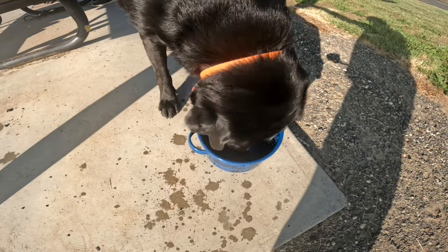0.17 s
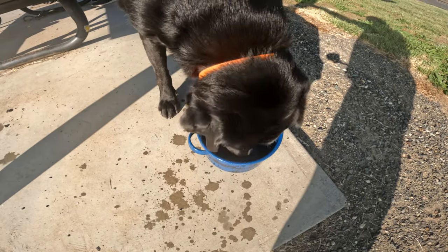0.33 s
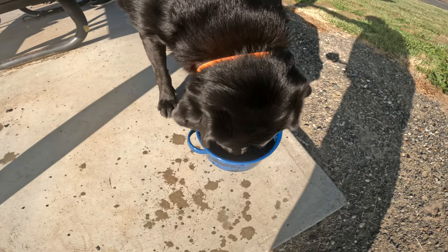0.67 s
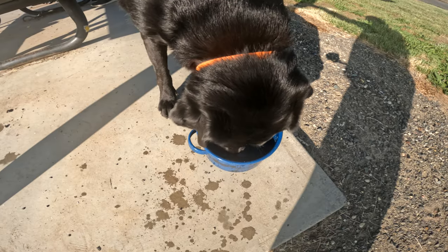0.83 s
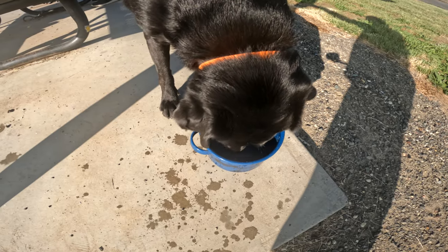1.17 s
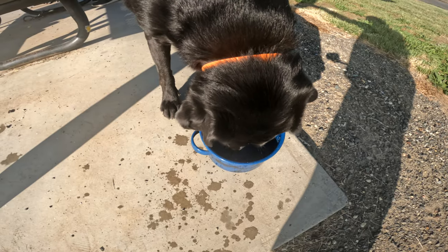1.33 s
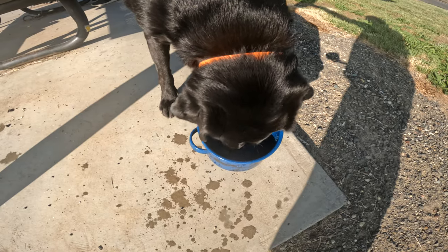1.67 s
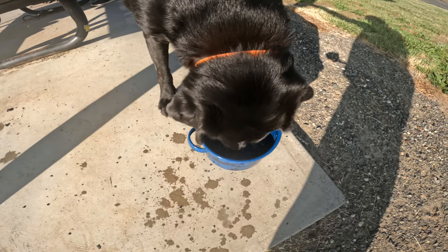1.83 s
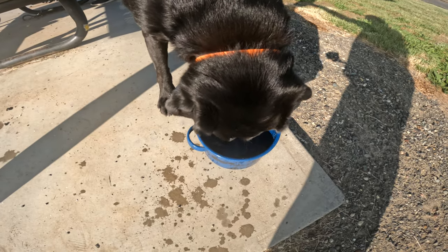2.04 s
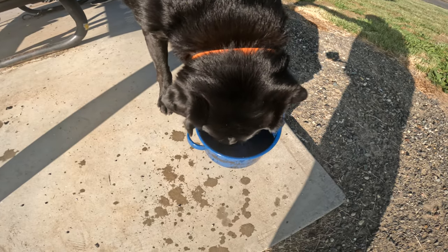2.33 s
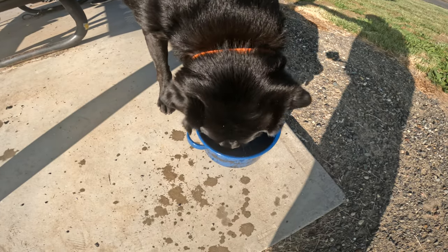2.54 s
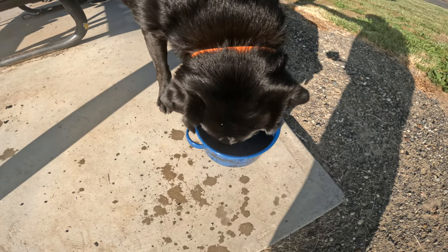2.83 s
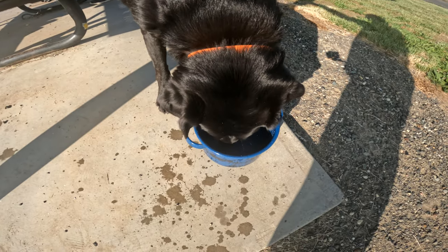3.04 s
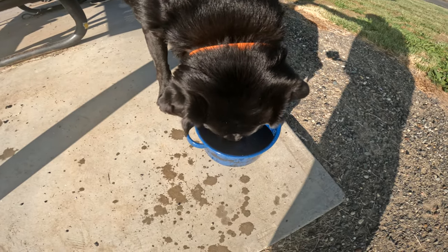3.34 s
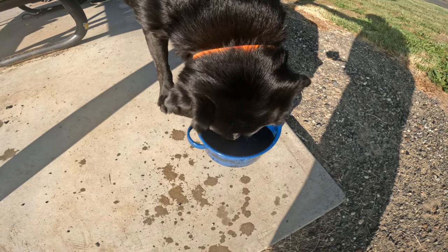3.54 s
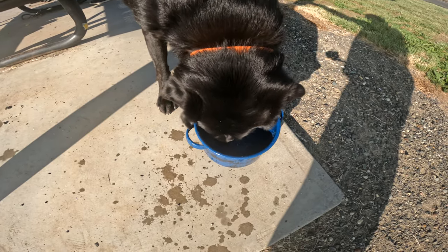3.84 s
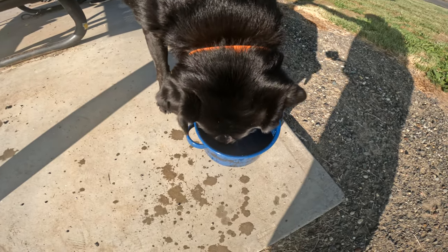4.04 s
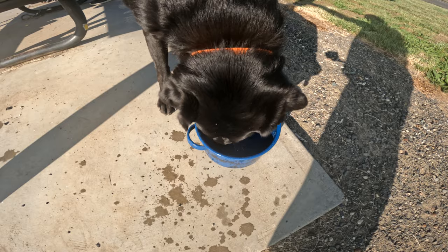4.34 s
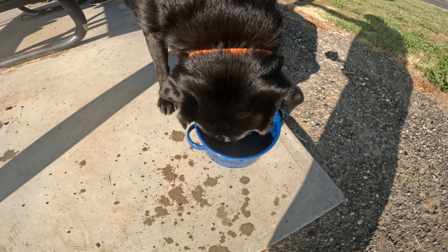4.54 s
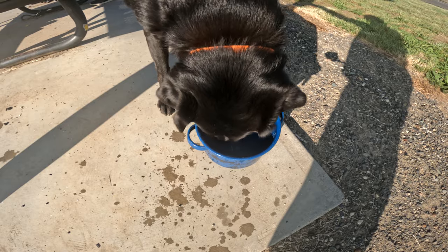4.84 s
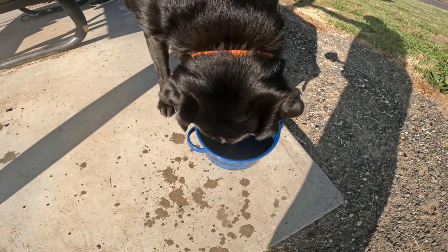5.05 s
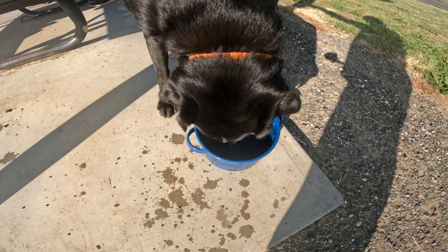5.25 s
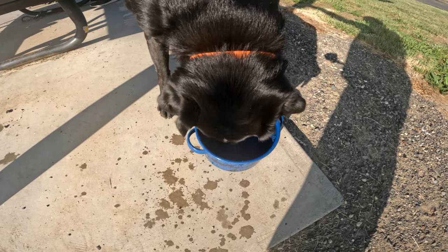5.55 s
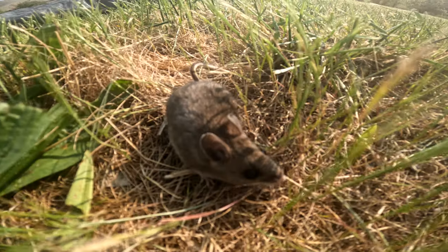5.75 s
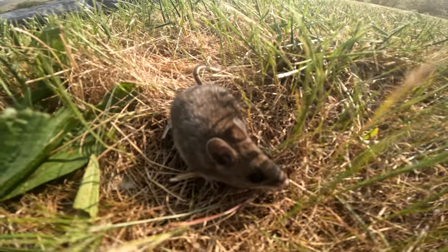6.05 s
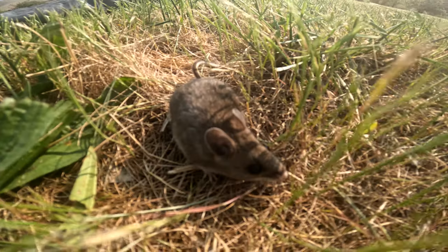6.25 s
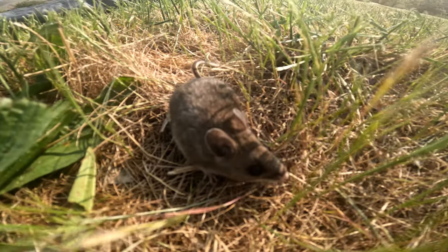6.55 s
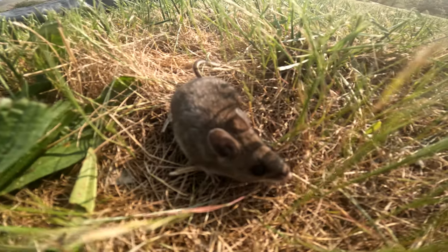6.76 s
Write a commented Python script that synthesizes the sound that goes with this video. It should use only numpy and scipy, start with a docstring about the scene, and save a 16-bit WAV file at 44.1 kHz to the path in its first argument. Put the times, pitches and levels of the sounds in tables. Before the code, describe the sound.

In quiet open air, dull low wind thuds bump the microphone in the first 0.2 seconds, with a faint buzzy bird call. From about 0.2 s a big dog laps water close by, nearly three times a second, from a plastic bowl on concrete. Each lap is a small splash, a hollow gulp and a crisp wet snap of the jaws, with bubbles, drips and bright ticks between and slight bowl resonance. A cricket chirps high and softly behind; a bird trills at 0.6-0.9 s and others whistle occasionally. Wind returns lightly near 3.6 s, thuds most strongly around 4.1-4.6 s and bumps again at 5.7 s. Snaps grow sharper towards the end. At 5.8 s lapping and cricket stop abruptly with a dry click. Much quieter sound follows: short sliding bird chirps over a distant, fading low rumble, with a faint grass rustle near 6.4 s.

```python
"""Dog drinking outdoors

A big dog laps water from a plastic bowl on a concrete pad, nearly three laps a second. In each lap the tongue
strikes the water and lifts a splashing column whose hollow closes with a gulp; the jaws snap. These are ringing
air pockets over bubbles and filtered noise, coloured by bowl resonances and weak reflections. Wind is low noise
with thuds; birds and a cricket are gliding tones. Then the scene changes with a dry click: lapping and cricket
stop, and a distant rumble comes in under the birdsong."""
import sys
import numpy as np
from scipy import signal
from scipy.fft import rfft, irfft, next_fast_len
from scipy.io import wavfile
from scipy.ndimage import uniform_filter1d

SR = 44100
rng = np.random.default_rng(int(sys.argv[2]) if len(sys.argv) > 2 else 0)


def store_wav(level_fs):
    """Save 16-bit WAV to argv[1]."""
    pcm = np.round(np.clip(np.atleast_2d(level_fs), -1, 1) * 32767)
    wavfile.write(sys.argv[1], SR, pcm.T.astype(np.int16))


N = 304255
TIME = np.arange(N) / SR
LAPPING_END_S = 5.81

# The laps, one row each; every delay counts from the strike.
# Each row: strike in seconds, strike level in dB, lift delay in seconds, spatter level in dB, spray level in dB,
# gulp delay in seconds, gulp pitch in Hz, gulp level in dB, snap delay in seconds, snap pitch in Hz, snap level in dB.
LAPS = [(0.233, -52, 0.013, -40.5, -45, 0.034, 439.5, -30, 0.078, 3490, -29),
        (.508, -36, 0.041, -37, -43, 0.076, 650, -32, .12, 3400, -25),
        (0.854, -50, 0.034, -41.5, -52, 0.12, 220.5, -26, 0.16, 1100, -38.5),
        (1.206, -45.5, 0.028, -43, -42, 0.067, 520, -33, 0.12, 1100, -37.5),
        (1.598, -42.5, 0.06, -42, -47, 0.1, 389, -24, 0.15, 2630, -32),
        (1.946, -45.5, 0.056, -44.5, -44.5, 0.088, 395.6, -27, 0.14, 3260, -35.5),
        (2.358, -51.5, 0.07, -35.5, -40, 0.089, 565, -30.5, 0.14, 3100, -20),
        (2.691, -42, 0.044, -43.5, -43, 0.086, 414, -21.5, 0.13, 3780, -32.5),
        (3.069, -38.5, 0.046, -41, -46, 0.1, 429.5, -25, 0.13, 1640, -26),
        (3.403, -46.5, 0.054, -42, -42.5, 0.089, 442.4, -27.5, 0.18, 2344, -48.5),
        (3.82, -43.5, 0.071, -38, -49, .099, 498, -29.5, .127, 2960, -26),
        (4.145, -39, 0.054, -35.5, -42.5, 0.094, 357, -27.5, 0.13, 3390, -30),
        (4.527, -40, 0.048, -39, -44, 0.097, 435.4, -26, 0.14, 3860, -28.5),
        (4.855, -36, 0.035, -39, -39, 0.09, 480, -27.5, 0.12, 945, -27.5),
        (5.246, -44.5, 0.053, -36, -44.5, 0.095, 412.3, -27.5, 0.1345, 2480, -20),
        (5.591, -40, 0.044, -41, -46, 0.095, 500, -28.5, .1135, 2730, -17.5)]
# Colour of the spatter. Each row: frequency in Hz, relative level in dB.
SPATTER_COLOUR = [(150, 16), (300, -6), (560, 0), (780, -19.5), (1100, 6.5), (1400, -7), (2300, -1.5),
                  (3500, -3), (5000, -2.5), (7000, -8), (10000, -28.5)]
# Water pockets swell over a few cycles; those above the reference pitch ring shorter.
POP_RISE_CYCLES, POP_REFERENCE_HZ = 1.01, 2000


def undb(db):
    """Decibels to gain."""
    return 10 ** (np.asarray(db) / 20)


def unit(x):
    """Scale to rms 1."""
    return x / np.sqrt(np.mean(x ** 2))


def even(x, seconds):
    """Hold the short-term rms close to 1."""
    k = int(seconds * SR) + 1
    power = uniform_filter1d(uniform_filter1d(x ** 2, k), k)
    return x / np.sqrt(power + 1e-12)


def span(seconds):
    """Time axis of a short sound."""
    return np.arange(int(seconds * SR) + 2) / SR


def fade(t, t60):
    """Exponential decay by 60 dB in t60 seconds."""
    return np.exp(-np.log(1000) * t / t60)


def swell(s, width_s, db):
    """A bell-shaped rise and fall in level around time s."""
    return undb(db) * np.exp(-((TIME - s) / width_s) ** 2)


def walk(rate):
    """Random drift of rms 1, with about `rate` new values a second."""
    k = int(SR / rate)
    steps = np.repeat(rng.standard_normal(N // k + 1), k)
    return unit(uniform_filter1d(steps, k)[:N])


def add(out, s, x):
    """Mix x into out at time s."""
    i = min(max(int(s * SR), 0), N)
    out[i:i + len(x)] += x[:N - i]


def place(x, pan_db):
    """Put a sound between left and right; negative leans right."""
    return x * undb(np.array([[pan_db], [-pan_db]]) / 2)


def colour(x, points):
    """Causal minimum-phase filter through the given (Hz, dB) points."""
    hz, db = np.transpose(points)
    size = 8192
    grid_hz = np.fft.rfftfreq(size, 1 / SR) + 1
    response_db = np.interp(np.log(grid_hz), np.log(hz), db)
    cepstrum = irfft(np.log(undb(response_db)))
    # folding the cepstrum forwards makes the response causal
    cepstrum[1:size // 2] *= 2
    cepstrum[size // 2 + 1:] = 0
    impulse = irfft(np.exp(rfft(cepstrum)))
    return signal.oaconvolve(x, impulse)[:len(x)]


def band(x, low_hz, high_hz, order=2):
    """Butterworth band-pass."""
    edges = [low_hz, min(high_hz, SR / 2 - 1000)]
    return signal.lfilter(*signal.butter(order, edges, "band", fs=SR), x)


def noise(points):
    """Coloured noise of rms 1."""
    return unit(colour(rng.standard_normal(N), points))


def pocket(hz, t60, glide, rise_cycles=0.071):
    """An air pocket swells, rings and rises in pitch as it nears the surface; returns tone and envelope."""
    t = span(t60)
    envelope = (1 - np.exp(-t * hz / rise_cycles)) ** 2 * fade(t, t60)
    envelope /= envelope.max()
    bend = 1 + glide * (t / t60 - 1 / 3)
    return envelope * np.sin(2 * np.pi * hz * t * bend), envelope


def bubbles(rate, low_hz, high_hz, cycles, scatter_db, glide):
    """A dense stream of tiny bubbles of uneven size, each swelling softly and gliding upwards."""
    out = np.zeros(N)
    for when, pitch, size, life in rng.random((int(rate * N / SR), 4)):
        hz = low_hz * (high_hz / low_hz) ** pitch
        tone, _ = pocket(hz, cycles * (.5 + life) / hz, glide, POP_RISE_CYCLES)
        level = hz / high_hz * undb(-scatter_db * np.log(1 - size))
        add(out, when * N / SR, tone * level)
    return out


def froth(low_hz, high_hz, patchy_db, rate, count):
    """Countless bursting films, heard as noise whose bands flare up independently."""
    edges = np.geomspace(low_hz, high_hz, count + 1)
    total = np.zeros(N)
    for lo, hi in zip(edges, edges[1:]):
        total += band(rng.standard_normal(N), lo, hi) * undb(patchy_db * walk(rate))
    return unit(total)


def outdoors(air_db=-58, rumble_db=-53.5):
    """Quiet air, a far bird's buzz at first, then, after the lapping, a distant rumble and two bursts of noise."""
    # Colour of the open air. Each row: frequency in Hz, relative level in dB.
    air_colour = [(30, 2.5), (100, -21.5), (180, -3.5), (300, -17), (600, -26.5), (2500, -36),
                  (4000, -36.5), (5200, -25), (6500, -36.5), (12500, -43), (14000, -56.5)]
    # Colour of the rumble. Each row: frequency in Hz, relative level in dB.
    rumble_colour = [(30, -19.5), (80, 2), (150, 4.5), (220, -4), (330, -13.5), (520, -45.5)]
    # Bursts of noise: the breath in a rough bird chirp, then a rustle of grass.
    # Each row: middle in seconds, half-width in seconds, level in dB.
    noise_bursts = [(5.915, 0.027, -66.5), (6.401, 0.053, -61.5)]
    wide = undb(-5.0) * noise(air_colour) * np.array([[1], [-1]])  # opposite in left and right
    air = (noise(air_colour) + wide) * undb(air_db + 0.54 * walk(0.68))
    sinking_db = np.interp(TIME, [6.0, 6.8], [2, -8])
    rumble = noise(rumble_colour) * undb(rumble_db + sinking_db) * (TIME > LAPPING_END_S)
    buzz = noise([(3500, -45.5), (4700, 1.0), (5500, 7), (6800, -6), (9000, -28)])
    buzz = buzz * swell(0.09, 0.094, db=-57) * undb(2.0 * walk(115))
    hiss = noise([(300, -11), (1400, 2.5), (3000, -2), (7000, 5.5), (13000, -13)]) * undb(3.4 * walk(180))
    breath_and_grass = hiss * sum(swell(*burst) for burst in noise_bursts)
    return air + place(rumble, pan_db=-4.0) + buzz + breath_and_grass


def wind(breeze_db=-62.5, flutter_db=4):
    """Gusts over a light breeze rumble on the microphone as low noise; the hardest buffets land as thuds."""
    # Gusts. Each row: middle in seconds, half-width in seconds, level in dB before the flutter.
    gusts = [(.5, 0.31, -46.5), (3.45, 0.24, -51), (4.15, 0.11, -28), (4.47, 0.1, -33), (5.2, 0.19, -46.5),
             (5.67, 0.082, -34.5)]
    # Dull thuds. Each row: start in seconds, pitch in Hz, peak level in dB before panning.
    thuds = [(0.049, 28, -24), (0.102, 36.8, -19.5), (0.138, 99, -30), (.408, 27.5, -29.5),
             (.543, 35, -26.5), (0.766, 49, -32), (3.583, 50, -28), (3.693, 25.7, -33.5),
             (4.119, 61, -21.5), (4.184, 104, -16.5), (4.283, 37.4, -23.5), (4.527, 57.5, -20),
             (5.68, 71, -26.5)]
    strength = undb(breeze_db) + sum(swell(s, width_s, db) for s, width_s, db in gusts)
    strength = strength * undb(flutter_db * walk(25))
    roar = noise([(10, -8.5), (22, 2.5), (45, 3), (130, -15.5), (220, -27.5), (500, -74.0), (2000, -87)])
    out = strength * even(roar, 0.11)
    for s, hz, db in thuds:
        tone, _ = pocket(hz, 3.87 / hz, glide=0)
        add(out, s, undb(db) * tone)
    return out


def cricket(chirp_hz=5290, overtone_db=-35, rasp=0.036):
    """Three wing strokes a chirp, each rasping a little and arching in pitch as the wing speeds up and slows."""
    # Chirps. Each row: start in seconds, typical stroke level in dB.
    chirps = [(.223, -43), (.555, -46), (0.945, -46.5), (1.137, -45), (1.421, -44), (1.852, -45.5),
              (2.119, -45), (2.641, -43), (2.914, -41), (3.577, -44), (4.3, -46.5), (4.992, -43.5),
              (5.218, -46.5), (5.484, -44.5), (5.741, -47)]
    out, stroke_s, sag = np.zeros(N), .032, .14
    u = span(stroke_s) / stroke_s
    arch = sag * (u.var() - (u - .4) ** 2)
    for s, db in chirps:
        for k, (pitch, force) in enumerate(rng.standard_normal((3, 2))):
            roughness = rasp * rng.standard_normal(len(u))
            hz = chirp_hz * (1 + .008 * pitch + roughness + arch)
            phase = 2 * np.pi * np.cumsum(hz) / SR
            stroke = np.sin(np.pi * u) ** 2 * (np.sin(phase) + undb(overtone_db) * np.sin(2 * phase))
            add(out, s + k * stroke_s, undb(db + 2.6 * force) * stroke)
    return out


def birds(waver_db=2.5, waver=.006, trill_s=0.59, note_s=0.03, count=9):
    """Songbirds slur arched whistles that waver a little in strength and pitch; one trills rising notes."""
    # Whistles. Each row: start in seconds, length in seconds, start, middle and end pitch in Hz before the waver,
    # level in dB before the waver.
    whistles = [(0.472, 0.044, 6140, 6730, 7200, -51), (1.083, 0.1, 2620, 3280, 3330, -61),
                (1.412, 0.075, 4650, 3700, 3300, -76), (2.617, 0.057, 2700, 3250, 3420, -60),
                (4.402, 0.087, 7100, 7000, 7730, -57), (4.681, 0.078, 7800, 6100, 6000, -49),
                (4.8, 0.073, 8140, 6500, 5800, -50.5), (5.902, 0.018, 4450, 4370, 3500, -52),
                (5.903, 0.022, 5700, 5560, 4970, -53), (6.011, 0.042, 5000, 5380, 5460, -54.5),
                (6.034, 0.069, 5000, 3510, 2930, -61.5), (6.125, 0.028, 4260, 4200, 3530, -66),
                (6.157, 0.039, 4680, 4990, 5050, -57), (6.167, 0.065, 4800, 3400, 2900, -63),
                (6.248, 0.062, 4400, 3650, 2650, -58.5), (6.394, 0.066, 4400, 3630, 2700, -54.5),
                (6.401, 0.035, 4770, 5150, 5160, -55.5), (6.783, 0.037, 3530, 3960, 3990, -65.5)]
    out, strength, detune = np.zeros(N), undb(waver_db * walk(110)), 1 + waver * walk(280)
    trill = [(trill_s + k * note_s, note_s, 4000, 4530, 4850, -59) for k in range(count)]
    for s, length, start_hz, middle_hz, end_hz, db in whistles + trill:
        u = np.linspace(0, 1, int(length * SR))
        slur = np.polyfit([0, .5, 1], [start_hz, middle_hz, end_hz], 2)
        hz = np.polyval(slur, u) * np.interp(s + u * length, TIME, detune)
        add(out, s, undb(db) * np.sin(np.pi * u) * np.sin(2 * np.pi * np.cumsum(hz) / SR))
    return out * strength


def distant(x, trees_db=-11, t60=.2):
    """Trees scatter a faint tail of decaying noise behind far calls."""
    t = span(t60)
    trees = rng.standard_normal(len(t)) * fade(t, t60)
    return x + undb(trees_db) * signal.fftconvolve(x, trees / np.linalg.norm(trees))[:N]


def drips(drip_db=-64, ripple_db=-66, fizz_db=-69, start_s=0.216):
    """Under the laps, drops trickle from the jowls into rippling water and tiny bubbles burst on it."""
    drops = bubbles(rate=170, low_hz=630.0, high_hz=3070, cycles=41, scatter_db=3.5, glide=0.2)
    drops = unit(colour(drops, SPATTER_COLOUR))
    fizz = unit(bubbles(rate=110, low_hz=1482, high_hz=6340, cycles=40, scatter_db=1.5, glide=0.092))
    ripple = unit(colour(froth(620, 5220, patchy_db=11.0, rate=70, count=4), SPATTER_COLOUR))
    return (undb(drip_db) * drops + undb(fizz_db) * fizz + undb(ripple_db) * ripple) * (TIME > start_s)


def ticks(t60=0.014, low_hz=2200, high_hz=10500, tick_db=-1):
    """Drops and wet lips snap with a very short, bright crack of noise."""
    # Sharp ticks of lips and flung drops. Each row: start in seconds, level in dB before the common trim.
    tick_times = [(0.897, -19.5), (1.236, -34), (1.459, -33.5), (1.597, -42), (2.354, -30), (2.773, -23),
                  (3.062, -32.5), (3.143, -22), (3.162, -24), (3.703, -33.5), (3.8167, -24.5), (3.871, -26),
                  (3.909, -18.5), (4.07, -33), (4.143, -47), (4.264, -24.5), (4.435, -36), (4.509, -38),
                  (4.7869, -28.5), (5.2372, -33.5), (5.3394, -20.5), (5.5143, -19.5)]
    out, t = np.zeros(N), span(t60)
    for s, db in tick_times:
        crack = band(rng.standard_normal(len(t)) * fade(t, t60), low_hz, high_hz)
        add(out, s, undb(db + tick_db) * crack / np.abs(crack).max())
    return out


def flare(db, t60, attack_s, hold_s=0):
    """Power of one splash over time: attack, hold, release."""
    t = span(hold_s + t60)
    envelope = (1 - np.exp(-t / attack_s)) * fade(np.maximum(t - hold_s, 0), t60)
    return (undb(db) * envelope / envelope.max()) ** 2


def splashing(attack_s=0.0015):
    """Levels of spatter, spray and squelch as every lap touches the water, strikes it, lifts it and squeezes it."""
    touch_lead_s, trail_db, trail_t60 = 0.0087, -51, 0.48  # a wet trail begins just before the strike
    touch_spray_db = -49.5
    strike_t60, strike_spray_db = 0.093, -9  # spray in dB over the strike
    # the lifted column builds up, holds until just after the gulp and dies away
    spatter_attack_s, spatter_hold_s, spatter_t60 = 0.014, 0.013, 0.27
    spray_attack_s, spray_hold_s, spray_t60 = 0.0011, 0.0063, 0.17
    # the jaws squeeze out water just before they snap; level in dB over the mean of spatter and snap
    squeeze_lead_s, squeeze_db, squeeze_t60 = 0.0043, -2.5, 0.033
    spatter, spray, squeeze = np.zeros((3, N))
    for strike_s, strike_db, lift_delay, spatter_db, spray_db, gulp_delay, _, _, snap_delay, _, snap_db in LAPS:
        touch_s, lift_s = strike_s - touch_lead_s, strike_s + lift_delay
        snap_s, lifting_s = strike_s + snap_delay, gulp_delay - lift_delay
        add(spatter, touch_s, flare(trail_db, trail_t60, attack_s))
        add(spray, touch_s, flare(touch_spray_db, spatter_t60, attack_s))
        add(spatter, strike_s, flare(strike_db, strike_t60, attack_s))
        add(spray, strike_s, flare(strike_db + strike_spray_db, strike_t60, attack_s))
        add(spatter, lift_s, flare(spatter_db, spatter_t60, spatter_attack_s, lifting_s + spatter_hold_s))
        add(spray, lift_s, flare(spray_db, spray_t60, spray_attack_s, lifting_s + spray_hold_s))
        squelch_db = (snap_db + spatter_db) / 2 + squeeze_db
        add(squeeze, snap_s - squeeze_lead_s, flare(squelch_db, squeeze_t60, attack_s))
    return np.sqrt([spatter, spray, squeeze])


def slosh(wash_db=-13, crackle_db=2.0, uneven_db=2.43):
    """Each splash flares up and dies away as bubbles, froth and fine spray; the closing mouth squelches."""
    # Colour of the spray. Each row: frequency in Hz, relative level in dB.
    spray_colour = [(1500, -28), (4000, -2.5), (7000, -4.5), (9500, -13), (12500, -21)]
    spatter_level, spray_level, squeeze_level = splashing()
    grains = unit(bubbles(rate=620, low_hz=224.6, high_hz=4210, cycles=46, scatter_db=3.0, glide=0.2))
    wash = undb(wash_db) * froth(400, 9000, patchy_db=6, rate=190, count=5)
    spatter = even(colour(grains + wash, SPATTER_COLOUR), seconds=.015)
    spatter = unit(spatter * undb(uneven_db * walk(90)))
    mist = froth(2030, 14700, patchy_db=6.5, rate=270, count=6)
    spray = unit(colour(mist, spray_colour) * undb(crackle_db * walk(400)))
    squelch = unit(band(even(grains, seconds=.01), 1010, 3800))  # band of the mouth
    return spatter * spatter_level + spray * spray_level + squelch * squeeze_level


def hollows(level_db=-20.5, lag_s=0.00787, width_s=.024, octave_s=.026):
    """The hollow under the tongue resonates lower as it deepens, and higher again as it fills after the gulp."""
    out, t = np.zeros(N), span(4 * width_s) - 2 * width_s
    for strike_s, _, _, _, _, gulp_delay, gulp_hz, gulp_db, *_ in LAPS:
        hz = gulp_hz * 2 ** np.minimum(np.abs(t) / octave_s, 2)  # deepest, so lowest, at t = 0
        churn = unit(band(rng.standard_normal(len(t)), 21, 160))
        ring = churn * np.sin(2 * np.pi * np.cumsum(hz) / SR) * np.exp(-(t / width_s) ** 2)
        add(out, strike_s + gulp_delay + lag_s + t[0], undb(gulp_db + level_db) * ring)
    return out


def pops(glide=0.063, splash_db=-11, splash_db_per_octave=4, splash_below=0.41, splash_above=1.386):
    """Air pockets of strikes, gulps, snaps and stray pops: middle sizes ring cleanest, others splash more."""
    # Air pockets that burst in churned water or under falling drops.
    # Each row: start in seconds, nominal pitch in Hz, level in dB.
    stray_pops = [(.263, 6460, -25.5), (.304, 1690, -29.5), (.5395, 2150, -22.5), (.5535, 1470, -27.5),
                  (.571, 1140, -36), (.5842, 3540, -27), (.614, 2380, -27), (.625, 1180, -29.5),
                  (.634, 3560, -25.5), (.671, 2340, -39.5), (.764, 3380, -37.5), (.85, 1840, -40),
                  (.8778, 2780, -28.5), (.8983, 4070, -20.5), (.8984, 6550, -18.5), (.914, 3700, -29),
                  (.954, 300, -36), (.979, 2590, -31), (.983, 1106, -31), (1.014, 323, -31),
                  (1.036, 335, -25.5), (1.235, 2833, -32), (1.301, 464, -34.5), (1.3142, 560, -34.5),
                  (1.316, 1054, -25), (1.537, 2650, -41), (1.596, 4750, -28), (2.0, 2170, -21.5),
                  (2.0295, 5540, -28.5), (2.063, 2550, -37), (2.356, 4140, -33.5), (2.385, 1660, -34),
                  (2.44, 2420, -20.5), (2.455, 2980, -38), (2.465, 2030, -33), (2.492, 1030, -33.5),
                  (2.4968, 5020, -24), (2.529, 3010, -36), (2.745, 1560, -30.5), (2.759, 2260, -29.5),
                  (2.7734, 2300, -29), (2.81, 1806, -35), (2.864, 2340, -39.5), (3.1447, 8300, -24),
                  (3.145, 2800, -24.5), (3.146, 620, -34.5), (3.1635, 7830, -27), (3.4613, 2410, -22.5),
                  (3.467, 5130, -31.5), (3.872, 3060, -33.5), (3.8825, 5100, -22), (3.909, 3710, -30),
                  (4.1459, 3700, -23), (4.146, 996, -31), (4.147, 1830, -32.5), (4.209, 2130, -29),
                  (4.2521, 990, -27), (4.263, 1067, -28.5), (4.564, 4630, -28.5), (4.657, 2080, -30),
                  (4.8574, 1118, -21.5), (4.911, 5100, -40), (4.919, 2930, -31.5), (4.925, 765, -28),
                  (4.971, 2380, -32), (5.237, 4500, -38), (5.253, 1098, -23.5), (5.3058, 1635, -27),
                  (5.424, 2130, -37), (5.446, 3470, -39.5), (5.641, 3160, -30.5), (5.642, 1750, -33.5),
                  (5.662, 1650, -38), (5.673, 980, -31.5), (5.772, 2835, -38.5)]
    strike_pockets, strike_t60, gulp_t60 = [(620, 2.4), (1090, 1.2)], 0.045, 0.011  # (Hz, dB over the strike)
    # hard pops are short: ring time at a reference level, and the rise in level that halves it
    pop_t60, pop_reference_db, pop_halving_db = 0.023, -24, 11.5
    least_ring_cycles = 9.4  # large, low pockets ring on for at least this many cycles
    out, pockets, bursts = np.zeros(N), [], list(stray_pops)
    for strike_s, strike_db, _, _, _, gulp_delay, gulp_hz, gulp_db, snap_delay, snap_hz, snap_db in LAPS:
        pockets += [(strike_s, hz, strike_db + db, strike_t60) for hz, db in strike_pockets]
        pockets.append((strike_s + gulp_delay, gulp_hz, gulp_db, gulp_t60))
        bursts.append((strike_s + snap_delay, snap_hz, snap_db))
    for s, hz, db in bursts:
        hardness = .5 ** ((db - pop_reference_db) / pop_halving_db)
        pockets.append((s, hz, db, pop_t60 * hardness * min(POP_REFERENCE_HZ / hz, 1) ** .5))
    for s, hz, db, t60 in pockets:
        ring_s = max(t60, least_ring_cycles / hz)
        tone, envelope = pocket(hz, ring_s, glide * rng.uniform(0, 2), POP_RISE_CYCLES)
        splash = unit(band(rng.standard_normal(len(tone)), hz * splash_below, hz * splash_above))
        octaves = np.log2(hz / POP_REFERENCE_HZ)
        share = undb(splash_db + splash_db_per_octave * max(octaves, -octaves / 2))
        add(out, s, undb(db) * (tone + share * splash * envelope) / np.hypot(1, share))
    return out


def bowl(water, ring_db=-49, scatter_db=-15, scatter_t60=0.18, shelter_db=-21, shelter_t60=0.2, side_db=1):
    """The bowl rings, its pitch swaying with the muzzle; dog, slab and picnic shelter throw back weak reflections."""
    # Resonances of the bowl with the muzzle in it.
    # Each row: pitch in Hz before the sway, t60 in seconds, relative level in dB.
    resonances = [(324, 0.097, -10), (561, 0.049, 2), (1023, 0.021, 9.5), (1715, 0.055, 7.5),
                  (2192, 0.066, -1), (2900, 0.11, 0.5)]
    drift = .012  # depth of the sway as a share of the pitch
    t = span(0.23)
    ring = sum(undb(db + ring_db) * np.cos(2 * np.pi * hz * t) * fade(t, t60) for hz, t60, db in resonances)

    def reflections():
        """One random pattern of two decaying scatters, from nearby and from the shelter."""
        fades = [fade(t, scatter_t60), fade(t, shelter_t60)]
        near, shelter = band(rng.standard_normal((2, len(t))), 480, 6000, order=1) * fades
        near = undb(scatter_db) * near / np.linalg.norm(near)
        shelter = undb(shelter_db) * shelter / np.linalg.norm(shelter)
        return near / 2 + shelter / 2

    # ringing on a swaying clock and back again moves the resonances but not the water
    sway_hz = len(LAPS) / LAPPING_END_S * (1 + .5 * walk(1.8))
    clock = np.cumsum(1 + drift * np.sin(2 * np.pi * np.cumsum(sway_hz) / SR))
    samples = np.arange(N)
    ringing = signal.fftconvolve(np.interp(samples, clock, water), ring)[:N]
    mid = water + np.interp(clock, samples, ringing) + signal.fftconvolve(water, reflections())[:N]
    side = undb(side_db) * signal.fftconvolve(water, reflections())[:N]
    return np.array([mid + side, mid - side])


def scene(click_db=-28):
    """The dog drinks a little right of centre until the scene changes with a dry click; wind is stronger right."""
    drinking = TIME < LAPPING_END_S
    dog = bowl(pops() + hollows() + slosh() + drips() + ticks()) * drinking
    click = np.zeros(N)
    add(click, LAPPING_END_S, undb(click_db) * fade(span(.02), 0.033))
    calls = distant(birds() + cricket() * drinking)
    return place(dog + click, pan_db=-1.0) + place(wind(), pan_db=-5.0) + calls + outdoors()


def record(dry, lag_samples=1.0, top_hz=15700):
    """Sound reaches the left microphone port slightly later; each port colours the treble and the top is cut."""
    # Treble response of the left port. Each row: frequency in Hz, level in dB.
    left_port = [(2500, 0.5), (12000, -1), (14200, -11.5)]
    # Treble response of the right port. Each row: frequency in Hz, level in dB.
    right_port = [(5000, 1.5), (12000, -4.5), (14200, -16.5)]
    size = 2 * next_fast_len(N // 2 + 1)
    delay = np.exp(-2j * np.pi * np.fft.rfftfreq(size) * lag_samples)
    left = irfft(rfft(dry[0], size) * delay)[:N]
    ports = np.array([colour(left, left_port), colour(dry[1], right_port)])
    return signal.sosfilt(signal.ellip(8, .2, 70, top_hz, fs=SR, output="sos"), ports)


dry = scene()
out = record(dry)
store_wav(out)
```